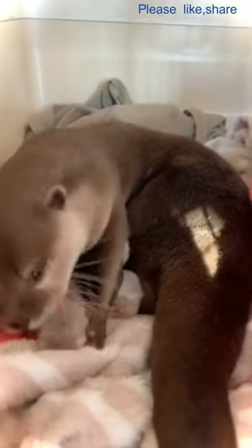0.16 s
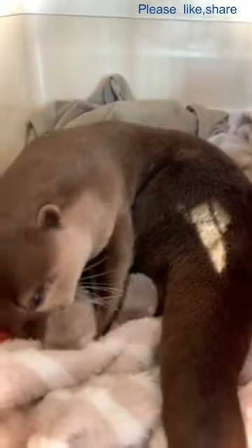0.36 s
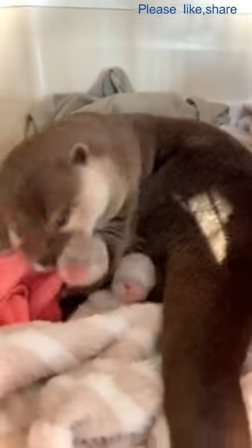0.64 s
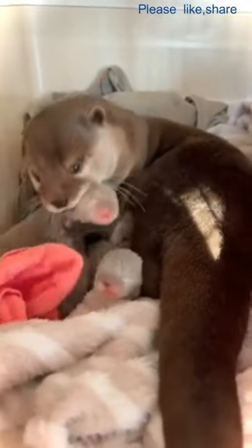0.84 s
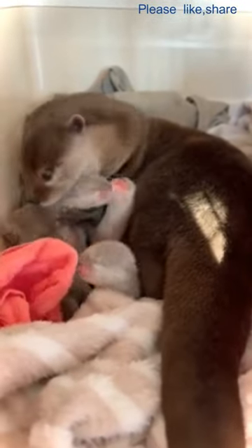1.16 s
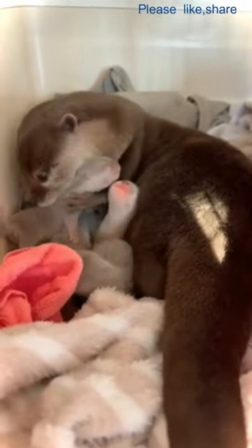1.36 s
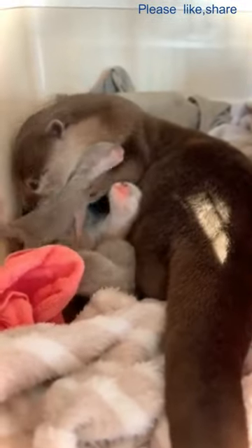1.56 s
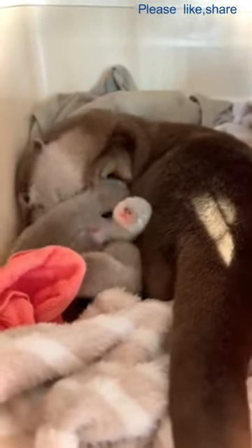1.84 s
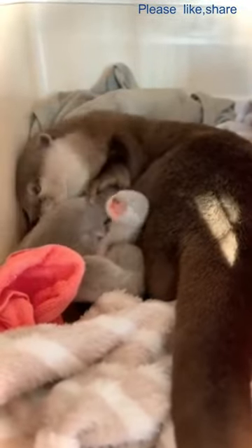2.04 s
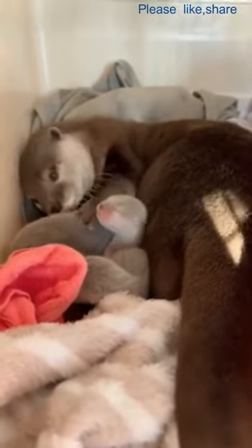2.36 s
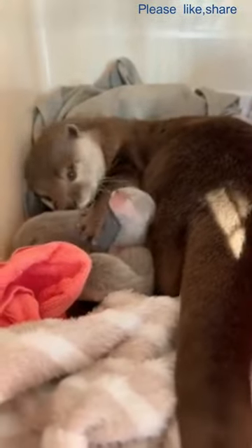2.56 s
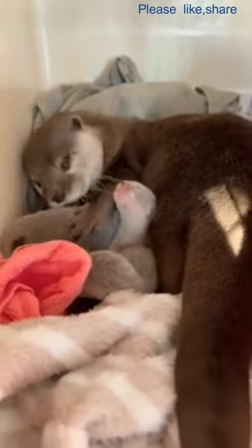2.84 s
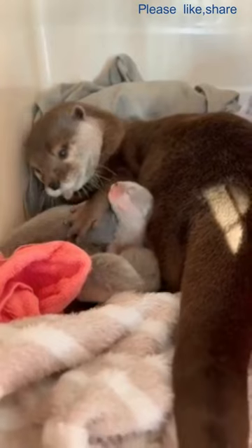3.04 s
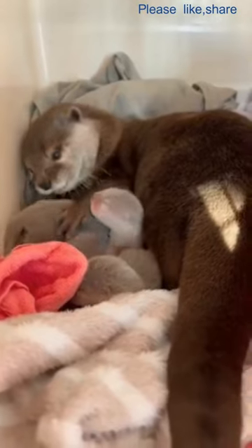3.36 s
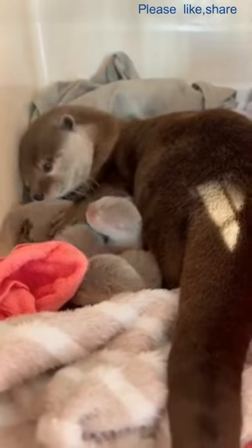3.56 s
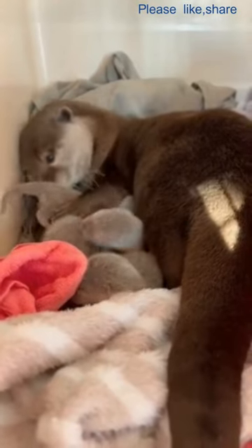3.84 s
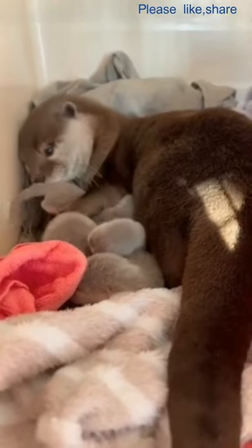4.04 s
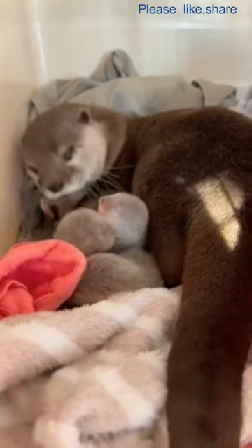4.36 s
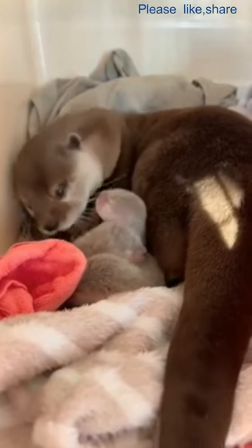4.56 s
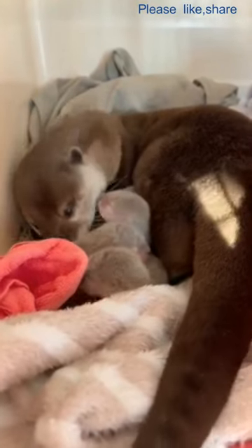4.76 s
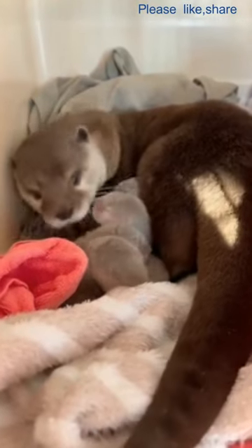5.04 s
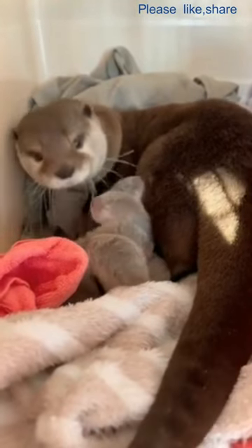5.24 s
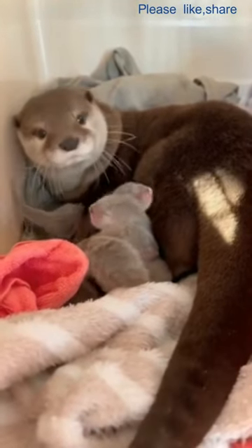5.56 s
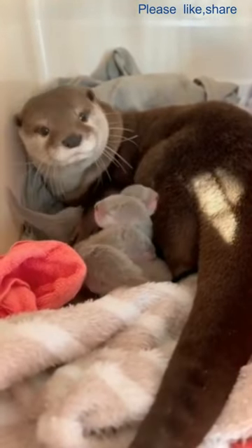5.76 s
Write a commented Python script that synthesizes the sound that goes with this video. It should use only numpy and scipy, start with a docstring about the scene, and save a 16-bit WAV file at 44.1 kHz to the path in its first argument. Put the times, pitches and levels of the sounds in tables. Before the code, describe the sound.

A mother otter gives a nasal whine that cracks into a creak, then four shrill squeals that slide down in pitch, the second loudest. Her pups mew, squeak and grunt faintly throughout and carry on after the squeals stop. Bodies scuff softly on fur and blankets, with a few small mouth and claw ticks. It is heard close up in a plastic nest box indoors, over a low machine hum.

```python
"""A mother otter whines and squeals among her pups in a plastic nest box, heard close up indoors.
Her vocal folds ring her nose in a whine that breaks into a creak; shrill falling squeals follow,
their harmonics picked out by the throat. The pups mew faintly, with thin squeaks and creaky grunts.
Bodies scuff on fur and blankets, mouths and claws tick, and the plastic walls add a short tail.
Under it all, the low hum of machines fills the room."""
import sys
import numpy as np
from scipy import signal
from scipy.fft import rfft, irfft, next_fast_len
from scipy.io import wavfile

SR = 44100
rng = np.random.default_rng(int(sys.argv[2]) if len(sys.argv) > 2 else 0)


def materialize(psi):
    """Save the field psi as 16-bit PCM at rate SR to the path in sys.argv[1].

    A 1-D psi becomes a single channel; in a 2-D psi each row is a channel.
    """
    bounded = np.clip(np.atleast_2d(psi).T, -1, 1)
    quanta = np.round(bounded * 32767).astype(np.int16)
    wavfile.write(sys.argv[1], SR, quanta)


N = 260631
T = np.arange(N) / SR
TOP_HZ = 15600
SIDE = np.array([[1], [-1]])  # adds on the left, subtracts on the right

# resonances of the throat: freq_hz, gain_db
THROAT = [(1000, -11), (2000, -15.5), (3200, -19.5), (4000, -25), (4800, -13), (6200, -2), (7800, 3.5),
          (9000, -10), (10300, -20.5), (12000, -9.5), (13800, -18.5), (15500, -33.5)]
# three rustle spectra (dull body, rasp, hiss), each: freq_hz, gain_db
RUSTLE_BANDS = [
    [(150, -36), (350, 1.5), (600, 5.5), (900, 2), (1400, -9), (2200, -32), (4000, -60)],
    [(800, -28), (1400, 4.5), (1950, 3.5), (2400, 0.5), (2700, -2), (3100, -4.5), (3600, -5), (3950, -8),
     (4400, -0.5), (5100, -20), (6000, -22.5), (9000, -47)],
    [(3000, -39.5), (5000, -8.5), (6300, 0), (7600, -5.5), (10000, -9.5), (12500, -9), (14000, -8.5),
     (15500, -15)],
]
# grunts, a note that drops into a creak: start_s, creak_length_s, start_hz, level_db, rasp_offset_db
GRUNTS = [(1.584, .05, 724, -39.5, -8.5), (1.687, .04, 698, -44.5, -2.5), (2.33, 0.056, 1053, -40.5, -8),
          (2.737, .115, 860, -39.5, -14.5), (3.089, 0.037, 1461, -42, -18), (3.329, 0.065, 721, -44, -15.5),
          (3.881, .07, 1150, -40.5, -8), (4.688, 0.0575, 1598, -39.5, -16), (4.93, .068, 1503, -38.5, -9.5),
          (5.191, .095, 1738, -44, -6.5), (5.48, .052, 772, -38.5, -4.5)]


def whine(clear_rough=0.062, creak_rough=0.68, bite_hz=2850, bite_db=10, air_db=-29):
    """Pulses of the vocal folds ring the nose; they stumble where the voice creaks."""
    # a steady whine, then a rising cry, each: time_s, pitch_hz, level_db
    phrases = [
        [(0, 451.7, -24), (.21, 465.8, -24), (.265, 458.5, -25), (.295, 435, -27.5), (.304, 440, -42),
         (.347, 398.7, -43)],
        [(.347, 422, -27.5), (.365, 433.4, -30), (.383, 343, -38), (.4, 368, -25.5), (.447, 389, -25.5),
         (.475, 384.5, -22), (.49, 438, -20.5), (.548, 461, -23), (.557, 480, -55)],
    ]
    # breaks in the voice: start_s, length_s
    creaks = [(0.357, .038), (.395, .028), (0.468, 0.048)]
    # nasal resonances: freq_hz, gain_db
    nose = [(150, -30), (300, 14.5), (450, 4), (920, 5), (1380, 6.5), (1840, 4.5), (2300, -8.5), (2760, -2),
            (3500, -13), (4150, -3.5), (5000, -10), (7000, -10.5), (8500, -23.5), (15000, -32.5)]
    times, pitches, _ = np.transpose(phrases[0] + phrases[1])
    hz = np.interp(T, times, pitches)
    loudness, rough = np.zeros(N), np.full(N, clear_rough)
    for phrase in phrases:
        start, _, db = contour(phrase)
        add(loudness, start, undb(db))
    for start, length in creaks:
        add(rough, start, creak_rough * swell(int(length * SR), edge=0.059))
    sounding = T < times[-1]
    voice = colour(glottis(hz, rough, jitter=.15, shimmer_db=5) * sounding, nose)
    voice /= np.std(voice[sounding])
    # the tight throat of the creak adds a biting resonance
    bite = signal.lfilter(*signal.iirpeak(bite_hz, Q=2.0, fs=SR), voice * rough)
    air = noise(nose) * sounding
    return (voice + undb(bite_db) * bite + undb(air_db) * air) * loudness


def glottis(hz, rough, jitter, shimmer_db):
    """The vocal folds give one sharp pulse a cycle; roughness makes spacing and strength uneven."""
    pulses, t, taps = np.zeros(N), .001, np.arange(-8, 9)
    window = np.hanning(len(taps))
    for late, strong in rng.uniform(-1, 1, size=(4000, 2)):
        i = int(t * SR)
        if i + len(taps) > N:
            break
        pulse = np.sinc(taps - t * SR % 1) * window
        pulses[i + taps] += pulse * undb(shimmer_db * rough[i] * strong)
        t += np.exp(jitter * rough[i] * late) / hz[i]
    return pulses


def squeals(flutter_hz=520, rolloff=0.88, jitter=.03, air_db=-9):
    """A shrill voice slides down; the throat picks out whichever harmonic passes through it."""
    # four squeals, each: time_s, pitch_hz, level_db, roughness (0-1)
    calls = [
        [(.559, 7100, -34, 0.51), (.565, 6900, -14, 0.5), (.6, 6710, -13.5, .45), (.613, 6424, -17.5, 0.7),
         (.621, 6060, -8, .05), (.64, 5463, -20.5, 0.4), (.672, 3720, -25.5, .3), (.695, 3243, -30.5, .2),
         (.707, 3235, -22, 0.23), (.745, 2502, -33, .3), (.757, 2160, -54.5, .3)],
        [(.924, 9600, -32, 0.1), (.937, 8710, -15, 0.4), (.946, 7930, 0, 0.07), (.96, 7650, -10, 0),
         (.981, 6606, -8.5, .05), (.988, 5660, -17, .05), (1.001, 5500, -38.5, 0), (1.018, 5137, -49, 0.35)],
        [(1.922, 9350, -45.5, 0.6), (1.93, 8425, -11.5, .4), (1.939, 7790, -5, .05), (1.972, 7240, -8.5, 0.07),
         (1.988, 6834, -23.5, 0.2), (2.005, 6220, -28.5, .4), (2.022, 4430, -36, 0.7),
         (2.035, 3990, -15.5, .77), (2.046, 3113, -35.5, 0.5), (2.075, 1701, -42, .9)],
        [(2.552, 5240, -42, .3), (2.572, 3860, -13, 0.2), (2.579, 3217, -27.5, 0.4), (2.605, 1950, -37, 0.28),
         (2.65, 1414, -37.5, .16)],
    ]
    out, orders = np.zeros(N), np.arange(1, 9)[:, None]
    for call in calls:
        start, hz, db, rough = contour(call)
        phase = phase_of(hz * (1 + jitter * rough * wander(300, len(hz))))
        weights = gain_at(orders * hz, THROAT) / orders ** rolloff * (orders * hz < TOP_HZ)
        weights /= np.sqrt(np.sum(weights ** 2, axis=0) / 2)
        voice = sum(w * hoarse_tone(k * phase, rough, flutter_hz) for k, w in zip(orders, weights))
        # a strained voice leaks turbulent air through the same throat
        air = undb(air_db) * rough * noise(THROAT, len(hz))
        add(out, start, (voice + air) * undb(db) + whistle(hz, db, flutter_hz))
    return out


def whistle(squeal_hz, squeal_db, flutter_hz, step_hz=6150, onset_hz=4300, fade_hz=600):
    """A thin, hoarse whistle rides a fixed step above a squeal while its pitch is high."""
    tone = hoarse_tone(phase_of(squeal_hz + step_hz), .6, flutter_hz)
    fade = np.clip((squeal_hz - onset_hz) / fade_hz, 0, 1)
    db = np.minimum(-24 + 0.22 * squeal_db, squeal_db)  # follows the squeal loosely, never louder
    return np.sqrt(2) * undb(db) * fade * tone


def mews():
    """Each mew of a pup is one arch or slide of pitch, buzzy when soft and purer when loud."""
    # mews: start_s, length_s, start_hz, middle_hz, end_hz, level_db
    calls = [(0.189, .098, 1327, 1565, 1440, -34.5), (.868, .058, 1426, 1955, 1700, -28),
             (0.921, 0.02805, 1740, 1844, 2200, -30), (0.952, .075, 2123, 1607, 1190, -41.5),
             (1.068, 0.11, 1111, 818, 472, -44.5), (1.178, 0.11, 805, 746, 1086, -42),
             (1.312, 0.058, 997, 987, 830, -45), (1.479, 0.029, 1007, 667, 518, -43),
             (1.845, 0.05, 1053, 1077, 1050, -45.5), (2.112, .18, 888, 784, 1025, -42.5),
             (2.38, .035, 1322, 1782, 2286, -41.5), (2.442, .15, 589, 576.3, 674, -38.5),
             (2.647, .05, 1108, 966, 993, -36), (2.805, 0.072, 565.7, 660, 475, -37),
             (2.982, 0.054, 463.4, 687, 1005, -36.5), (3.361, 0.023, 588, 612, 752, -33.5),
             (3.586, 0.088, 853, 759, 780, -40.5), (4.338, 0.081, 632, 983, 1073, -36),
             (4.826, 0.056, 1583, 2184, 1820, -40), (5.079, 0.048, 1277, 2173, 2210, -42),
             (5.461, .013, 1327, 1086, 1044, -41.5), (5.861, 0.046, 1767, 1930, 2260, -47)]
    out = np.zeros(N)
    for start, length, first, middle, last, db in calls:
        arch = np.polyfit([0, .5, 1], np.log([first, middle, last]), 2)
        hz = np.exp(np.polyval(arch, np.linspace(0, 1, int(length * SR))))
        overtone_db = -51.5 + .3 * (db + 40)  # the second harmonic gains only 0.3 dB per dB
        add(out, start, pup_voice(hz, db, second_db=overtone_db - db, rough=0.22))
    return out


def squeaks(ease=1.7):
    """Thin, hoarse calls whose pitch slides fast and levels off."""
    # squeaks: start_s, length_s, start_hz, end_hz, level_db
    calls = [(2.247, 0.053, 7300, 5820, -36), (3.597, .115, 6370, 5030, -53), (3.712, .05, 5130, 5960, -57),
             (3.807, .08, 6070, 2130, -48), (4.228, 0.034, 8430, 6300, -45.5),
             (4.512, 0.071, 7330, 6430, -45.5), (4.594, .042, 6900, 6140, -43.5)]
    out = np.zeros(N)
    for start, length, first, last, db in calls:
        slide = np.linspace(1, 0, int(length * SR)) ** ease
        hz = last * (first / last) ** slide
        add(out, start, pup_voice(hz, db, second_db=-18.5, rough=0.59))
    return out


def grunt_notes(length_s=.045, drop_s=.022, floor_hz=440):
    """Each grunt opens with a short voiced note that sinks."""
    out = np.zeros(N)
    sinking = np.exp(-T[:int(length_s * SR)] / drop_s)
    for start, _, first, db, _ in GRUNTS:
        hz = floor_hz * (first / floor_hz) ** sinking
        add(out, start, pup_voice(hz, db + 0.5, second_db=-12, rough=.3, edge=0.092))
    return out


def pup_voice(hz, db, second_db, rough, edge=0.11, jitter=0.05, rolloff=5.5, flutter_hz=260):
    """One pup call with weak overtones shaped by the throat; second_db is relative to the fundamental."""
    hz = hz * np.exp(jitter * rough * wander(120, len(hz)))
    phase = phase_of(hz)
    overtone_gain = undb(second_db) / np.mean(gain_at(2 * hz, THROAT))
    voice = 0
    for k in range(1, 7):
        weight = 1 if k == 1 else overtone_gain * gain_at(k * hz, THROAT) * (2 / k) ** rolloff
        harmonic = hoarse_tone(k * phase, rough * np.sqrt(k), flutter_hz)  # higher ones break up sooner
        voice += weight * (k * hz < TOP_HZ) * harmonic
    return np.sqrt(2) * undb(db) * swell(len(hz), edge) * voice


def hoarse_tone(phase, rough, flutter_hz):
    """Chaotic flutter of level and phase smears a clean tone into a band."""
    flutter = wander(flutter_hz, len(phase)) + 1j * wander(flutter_hz, len(phase))
    rough = np.clip(rough, 0, 1)
    modulation = np.sqrt(1 - rough ** 2) + rough * unit(flutter)
    return np.imag(modulation * np.exp(1j * phase))


def grumbles_and_scuffs(creak_lag_s=0.0047):
    """Grunts creak and bodies rub on fur and blanket: a heavy push is dull, a light brush hisses. The two hissy
    bursts at 0.666 s and 2.003 s are instead the mother's hoarse breath at the end of a squeal."""
    # scuffs: start_s, length_s, level_db, tilt_db (upwards trades body for hiss); the rows at 0.666 s and 2.003
    # s are breathy hiss at the end of a squeal
    scuffs = [(0.125, 0.1, -43.5, -10), (0.666, 0.026, -46.5, 18.5), (0.762, 0.075, -44.5, -1),
              (0.826, 0.074, -40, -5), (1.067, 0.092, -51.5, 3), (1.167, 0.066, -60.5, -14),
              (1.728, 0.066, -55.5, -9.5), (2.003, .06, -47, 19.5), (2.031, 0.11, -46, -6),
              (2.173, 0.1, -49.5, -7), (2.37, 0.059, -44, 7.5), (2.453, 0.1, -44.5, -1),
              (2.619, 0.085, -45.5, 4.5), (2.948, 0.12, -50.5, -7), (3.239, .05, -52.5, -13),
              (3.564, .035, -57, -16.5), (3.947, 0.064, -43.5, -2), (3.995, 0.053, -55, -15),
              (4.156, 0.091, -56, -11), (4.324, .11, -44.5, -3), (4.465, .036, -47, -9),
              (5.695, 0.093, -54.5, -5.5)]
    creaks = [(start + creak_lag_s, length, db, db + rasp_db, db + rasp_db - 8)
              for start, length, _, db, rasp_db in GRUNTS]
    rubs = [(start, length, db - tilt_db, db - 3, db + tilt_db) for start, length, db, tilt_db in scuffs]
    return rustle(creaks + rubs)


def rustle(bursts, creak_hz=430, fur_db=-6, crackle_db=1.5, flicker_db=1.4, echo_s=.00185, echo_db=-10):
    """Creaky pulses and rubbing fur, in bursts of: start_s, length_s, body_db, rasp_db, hiss_db."""
    out = np.zeros(N)
    creak = unit(glottis(np.full(N, creak_hz), rough=np.ones(N), jitter=.5, shimmer_db=6))
    fur = undb(fur_db) * rng.standard_normal(N)
    drive = (creak + fur) * undb(crackle_db * wander(500))
    drive += undb(echo_db) * np.roll(drive, int(echo_s * SR))  # hollow ring off the nearest wall
    edges_s = (.008, .018, .034)  # the body starts at once, rasp and hiss swell inside it
    for band, (spectrum, edge_s) in enumerate(zip(RUSTLE_BANDS, edges_s)):
        envelope = np.zeros(N)
        for start, length, *levels_db in bursts:
            shape = swell(int((length + edge_s / 2) * SR), edge_s / length)
            add(envelope, start - edge_s / 4, undb(levels_db[band]) * shape)
        flicker = undb(flicker_db * wander(45))
        out += envelope * unit(colour(drive * flicker, spectrum))
    return out


def ticks(width=0.12):
    """Wet ticks of mouths and claws: short bursts of crackle, each in one broad resonance."""
    # ticks: start_s, peak_db, ring_hz, t60_s
    hits = [(0.946, -19, 3920, .0053), (1.053, -25.5, 6300, 0.089), (1.075, -29.5, 7100, 0.018),
            (1.145, -35, 6240, 0.036), (2.4888, -17.5, 6770, 0.026), (4.284, -34, 1090, .03),
            (4.976, -31.5, 1490, .019), (5.2496, -35, 3840, .03), (5.756, -33, 7300, .025)]
    out, t = np.zeros(N), T[:SR // 20]
    for start, db, hz, t60 in hits:
        burst = rng.standard_normal(len(t)) * np.exp(-np.log(1000) * t / t60)
        resonance = signal.butter(2, [hz / (1 + width), hz * (1 + width)], "band", fs=SR, output="sos")
        ring = signal.sosfilt(resonance, burst)
        add(out, start, undb(db) * ring / np.abs(ring).max())
    return out


def stirring(body_db=-53, hiss_db=-71, surge_db=5.0, grain_db=4):
    """The litter never lies quite still: a faint, restless rustle."""
    motion = undb(surge_db * wander(3.9) + grain_db * wander(400))
    body, _, hiss = (unit(colour(rng.standard_normal(N) * motion, band)) for band in RUSTLE_BANDS)
    return undb(body_db) * body + undb(hiss_db) * hiss


def nest_box(x, t60_s=0.1, wet_db=-5, side_db=0.5):
    """The close plastic walls add a short, dense tail, partly different in each channel."""
    t = T[:SR // 4]
    decay = np.exp(-np.log(1000) * t / t60_s) * (t > .002)
    mid, side = rng.standard_normal((2, len(t))) * decay
    tails = mid + undb(side_db) * side * SIDE
    tails /= np.sqrt(np.sum(tails ** 2, axis=1, keepdims=True))
    return undb(wet_db) * signal.fftconvolve(x[None], tails, axes=1)[:, :N]


def room(side_db=-21, waver_db=3.0, drift_rad=0.77):
    """Machines hum and waver over a dull wash of air, nearly alike in both channels."""
    # machine hum: pitch_hz, level_db (relative to the air)
    hum_tones = [(60, -11), (130, -10), (152, -5)]
    # colour of the air: freq_hz, gain_db
    air_spectrum = [(25, -26.5), (40, -10.5), (59, 3), (110, -1), (154, 0), (271, -5), (373, -9),
                    (462, -23.5), (833, -28.5), (2850, -38), (5000, -44.5), (7000, -44.5), (9000, -48),
                    (13000, -42), (15000, -52.5)]
    # level ride of hum and air together: time_s, level_db
    ride = [(0, -40.5), (.8, -42), (1.2, -47), (1.7, -43), (2.7, -42), (3.2, -41), (4.5, -40), (5.9, -42)]
    hum = np.zeros(N)
    for hz, db in hum_tones:
        level = np.sqrt(2) * undb(db + waver_db * wander(12))
        hum += level * np.sin(2 * np.pi * hz * T + drift_rad * wander(3.2))
    mid, side = noise(air_spectrum), noise(air_spectrum)
    air = mid + undb(side_db) * side * SIDE
    return (hum + air) * undb(np.interp(T, *np.transpose(ride)))


def mic_ports(x):
    """Two microphone ports hear the nest with slightly different colour and phase."""
    # balance of the ports: freq_hz, left_minus_right_db
    balance = [(60, 0), (110, 1.5), (200, 2.3), (380, 1.4), (690, 3.4), (1280, 0.72), (2350, 1.8),
               (4340, 1.5), (8000, -1), (14700, -1.16)]
    # phase between the ports: freq_hz, left_lead_rad
    phase = [(0, 0), (340, -0.37), (600, 0.14), (1550, -0.62), (1890, -0.099), (2150, -0.43), (2670, 0.065),
             (4570, -0.0), (4820, -0.2), (5340, 0.31), (5680, 0.23), (7580, -0.25), (9300, -0.09),
             (14900, -0.048)]
    hz = np.arange(N // 2 + 1) * SR / N
    spectrum = pan(rfft(x), curve_at(hz, balance))
    return irfft(spectrum * np.exp(1j * SIDE / 2 * curve_at(hz, phase)), N)


def pan(x, left_db):
    """Place a source by its left minus right level."""
    return x * undb(SIDE * left_db / 2)


def undb(db):
    """Decibels to gain."""
    return 10 ** (np.asarray(db) / 20)


def unit(x):
    """Scale to rms 1."""
    return x / (np.sqrt(np.mean(np.abs(x) ** 2)) + 1e-12)


def phase_of(hz):
    """Running phase of a pitch path, in radians."""
    return 2 * np.pi * np.cumsum(hz) / SR


def curve_at(hz, points):
    """Read a (freq_hz, value) curve along a log frequency axis."""
    freqs, values = np.transpose(points)
    return np.interp(np.log(np.maximum(hz, 1)), np.log(freqs), values)


def gain_at(hz, spectrum):
    """Linear gain of a (freq_hz, gain_db) spectrum."""
    return undb(curve_at(hz, spectrum))


def colour(x, spectrum, size=8192):
    """Causal filter with the given spectrum, built from its cepstrum."""
    hz = np.arange(size // 2 + 1) * SR / size
    cepstrum = irfft(np.log(gain_at(hz, spectrum)))
    cepstrum[1:size // 2] *= 2
    cepstrum[size // 2 + 1:] = 0
    impulse = irfft(np.exp(rfft(cepstrum)))
    return signal.fftconvolve(x, impulse)[:len(x)]


def noise(spectrum, count=N):
    """Coloured noise of rms 1."""
    return unit(colour(rng.standard_normal(count), spectrum))


def wander(rate_hz, count=N):
    """Smooth random motion of rms 1 with the given speed."""
    step = max(int(SR / rate_hz / 20), 1)
    size = next_fast_len(count // step + 2, real=True)
    hz = np.arange(size // 2 + 1) * SR / step / size
    coarse = irfft(rfft(rng.standard_normal(size)) / (1 + (hz / rate_hz) ** 2), size)
    return unit(np.interp(np.arange(count) / step, np.arange(size), coarse))


def contour(rows):
    """Start time, then each control of a call for every sample."""
    times, *controls = np.transpose(rows)
    t = np.arange(times[0], times[-1], 1 / SR)
    return times[0], *(np.interp(t, times, control) for control in controls)


def swell(count, edge):
    """Envelope that fades in and out, each over the share `edge` of its length."""
    return signal.windows.tukey(count, min(2 * edge, 1))


def add(track, start_s, sound):
    """Mix a sound in at a time."""
    i = max(int(start_s * SR), 0)
    track[i:i + len(sound)] += sound[:N - i]


def scene(whine_send_db=-7):
    """The loud calls come from straight ahead, the small sounds from a little to the left."""
    nasal, shrill = whine(), squeals()
    nest = mews() + squeaks() + grunt_notes() + grumbles_and_scuffs() + stirring() + ticks()
    direct = mic_ports(nasal + shrill + pan(nest, left_db=2.5))
    walls = nest_box(undb(whine_send_db) * nasal + shrill + nest)
    return direct + walls + room()


def record(dry):
    """The phone clips at full scale and cuts the top."""
    lowpass = signal.ellip(8, .2, 70, TOP_HZ, fs=SR, output="sos")
    return signal.sosfilt(lowpass, np.clip(dry, -1, 1))


dry = scene()
out = record(dry)
materialize(out)
```